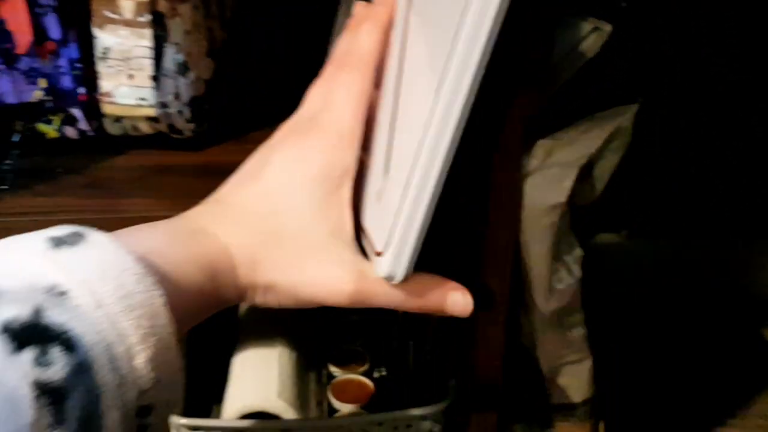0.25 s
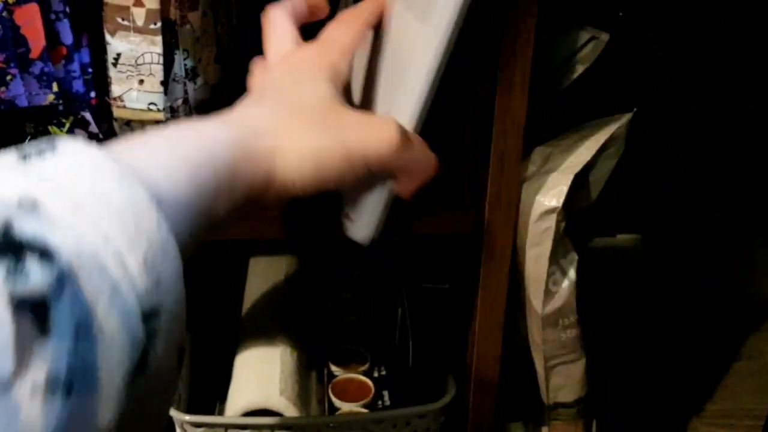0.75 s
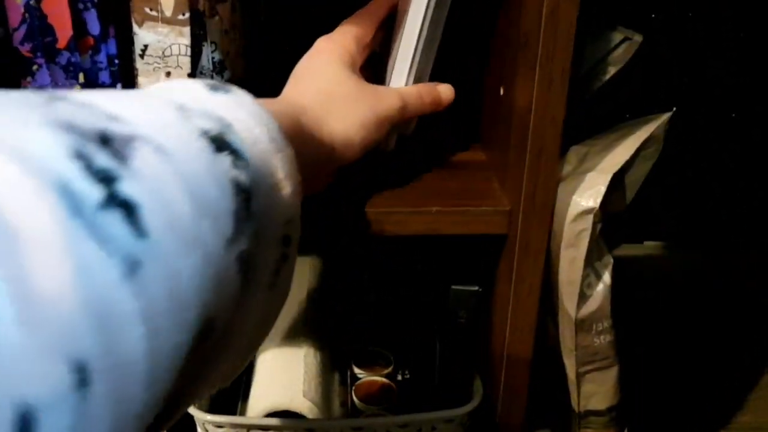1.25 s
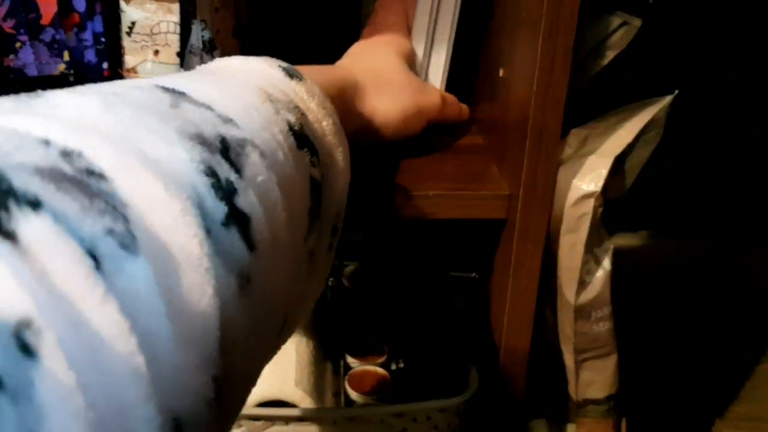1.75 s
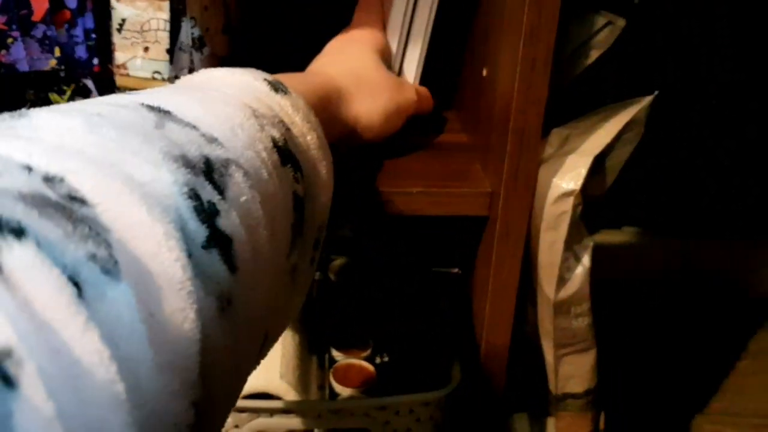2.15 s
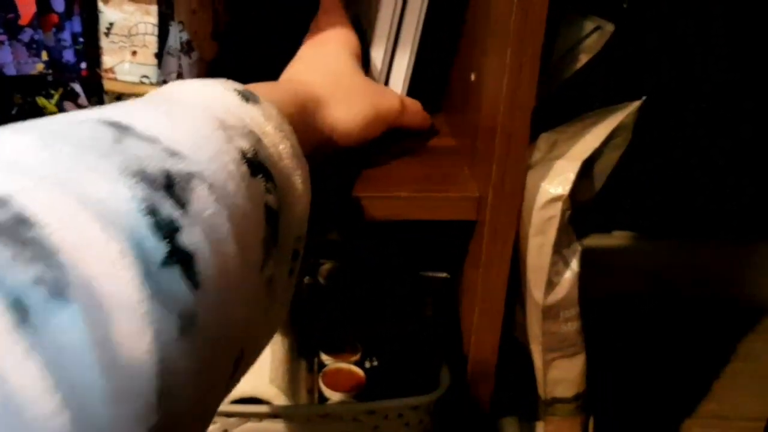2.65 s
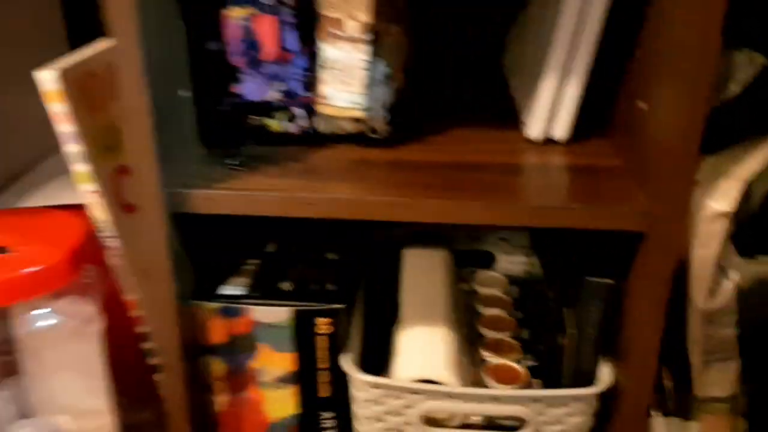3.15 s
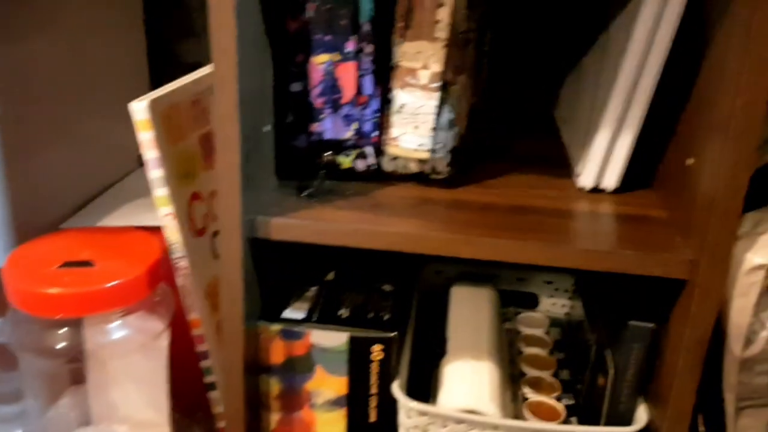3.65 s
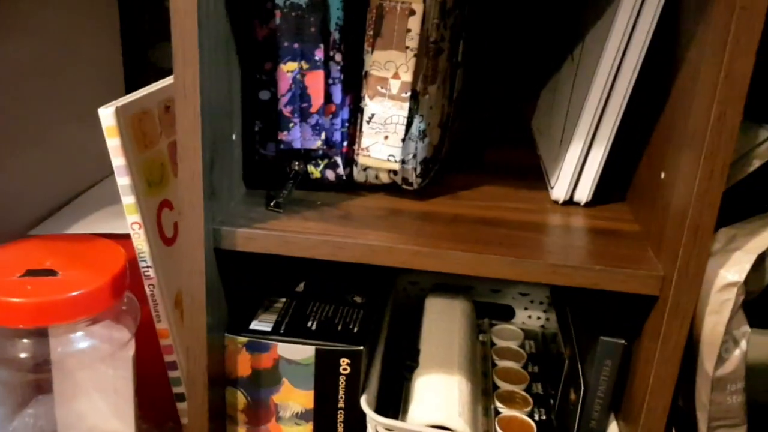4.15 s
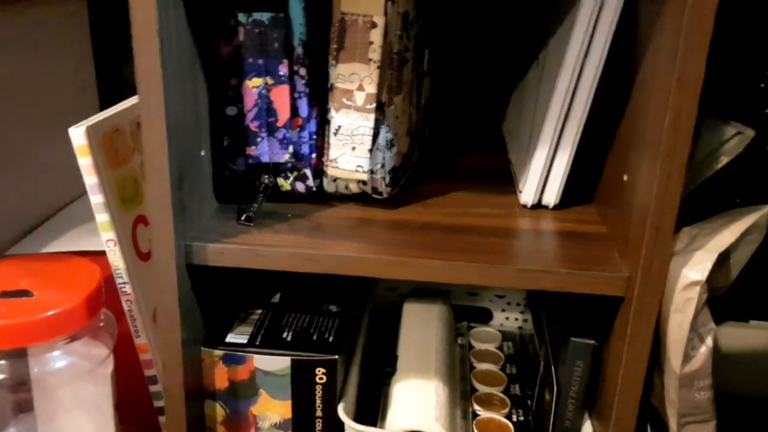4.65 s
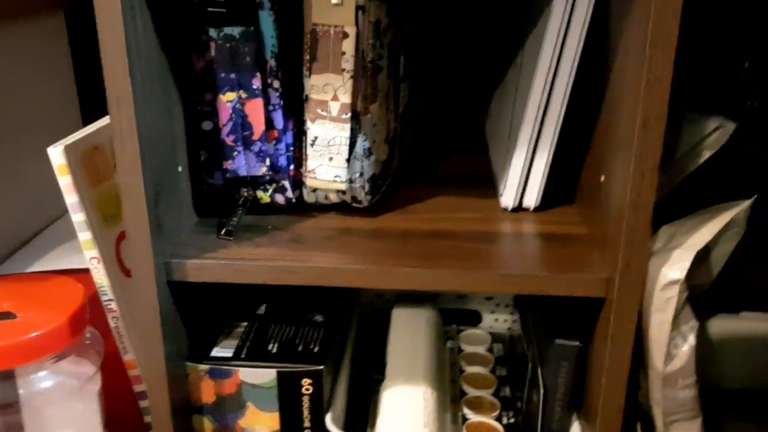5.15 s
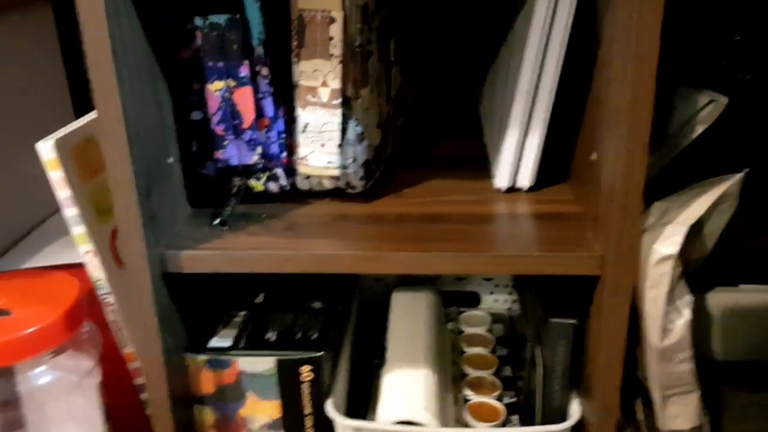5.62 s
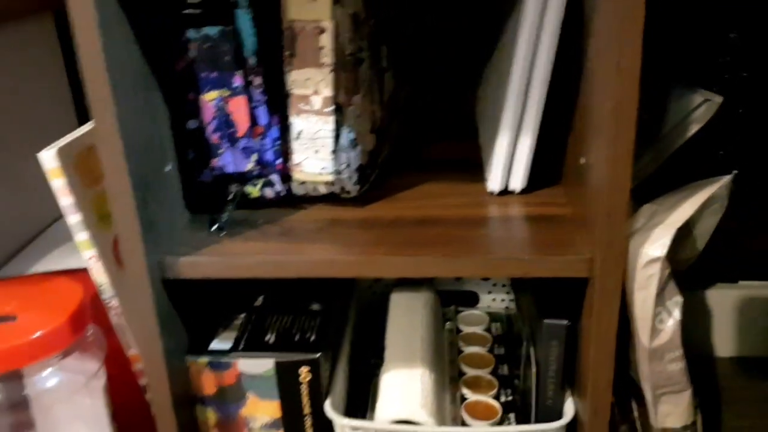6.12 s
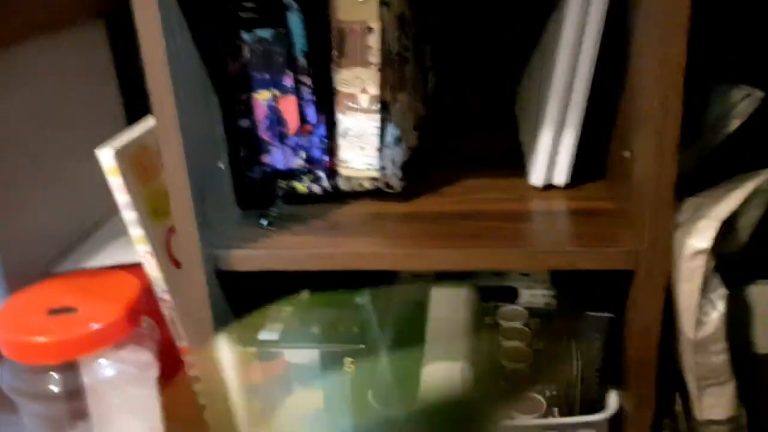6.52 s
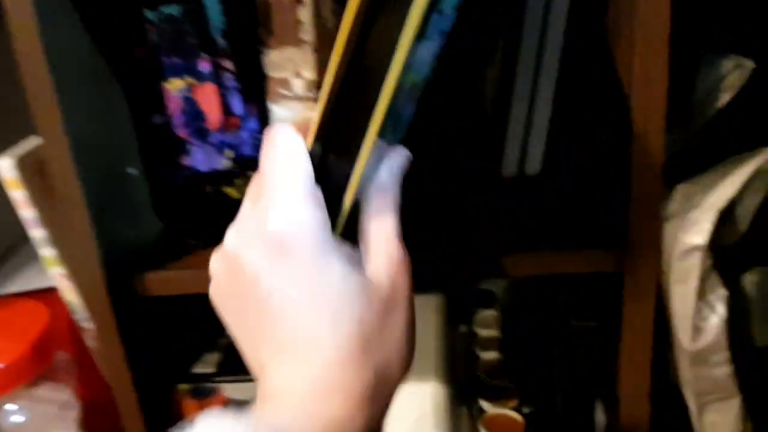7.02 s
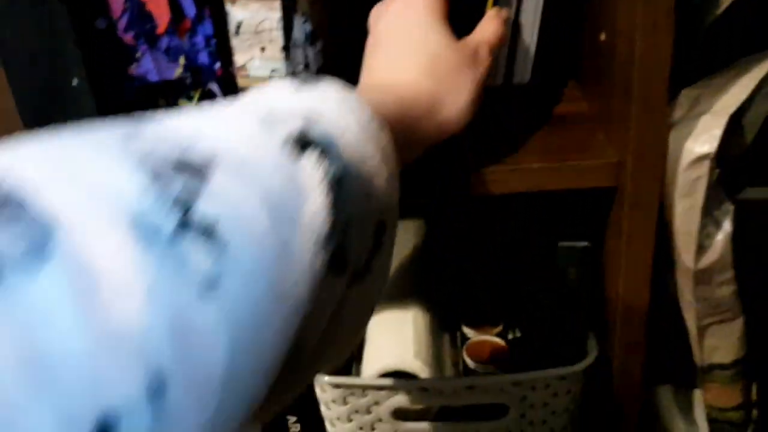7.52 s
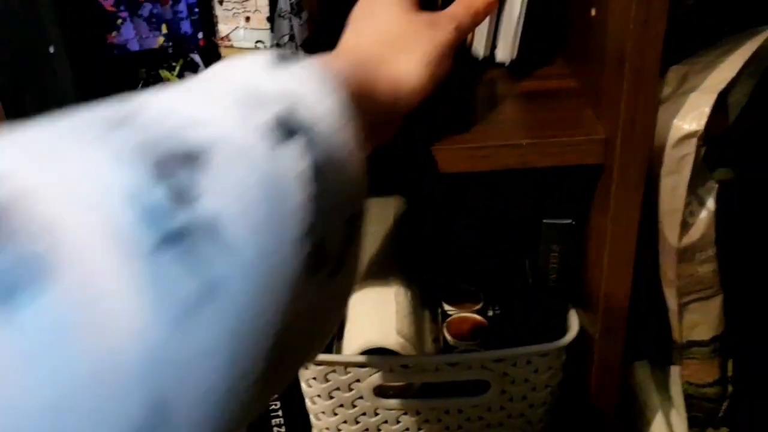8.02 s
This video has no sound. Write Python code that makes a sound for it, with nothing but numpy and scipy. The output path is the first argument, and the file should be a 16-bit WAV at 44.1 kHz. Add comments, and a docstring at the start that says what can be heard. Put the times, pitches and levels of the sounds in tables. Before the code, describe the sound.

Handling sounds at a wooden shelf, picked up by a hand-held stereo microphone, mostly louder on the left. Soft bumps, scraping and fleece brushing come first, then hard knocks with brief pencil rattle and short panel ring. Cases scuff and hiss against each other, another pair lands and squeaks slightly along the wood, and heavy muffled cloth thuds close it over a faint low hum.

```python
"""Flat pencil tins and cases slide about and are set down in a wooden shelf, close to a hand-held camera in a small room.
Each knock is a hard contact, a dying rattle of pencils and the ring of case, boards and struck panel.
Cases shoved over the wood stick and slip; rubs sound at a case's resonance, narrow or broad; one case hisses on another.
A fleece sleeve brushes past the microphone as flicking fibres, and soft thuds bump the camera body.
Every shove, rub and brush is one hand stroke that gathers speed, coasts and stops; the room adds short reflections."""
import sys
import numpy as np
from scipy import signal
from scipy.fft import rfft, irfft
from scipy.io import wavfile
from scipy.ndimage import uniform_filter1d

SR = 44100
rng = np.random.default_rng(int(sys.argv[2]) if len(sys.argv) > 2 else 0)


def materialize(psi):
    """Save the field psi as 16-bit PCM at rate SR to the path in sys.argv[1].

    A 1-D psi becomes a single channel; in a 2-D psi each row is a channel.
    """
    bounded = np.clip(np.atleast_2d(psi).T, -1, 1)
    quanta = np.round(bounded * 32767).astype(np.int16)
    wavfile.write(sys.argv[1], SR, quanta)


N = 365148  # samples

# colour of the room tone: (f/Hz, level/dB)
ROOM_TONE_COLOUR = [(25, -22), (52, -2), (98, -6.5), (130, -25), (5500, -35.5), (7900, -47.5),
                    (11800, -31.5)]
# shoves of a case over the wood, levels before the layer trims:
# (fastest at t/s, speeding up t/s, slowing down t/s, peak level/dB, bass against that level/dB)
SHOVES = [(0.01, 0.079, 0.23, -50, 5.5), (0.22, 0.1, 0.11, -48, 6), (0.44, 0.092, 0.062, -46.5, 6),
          (0.85, 0.18, 0.31, -43.5, 4.5), (1.3, 0.14, 0.43, -43.5, 3.5), (1.57, 0.057, 0.09, -49.5, 8.5),
          (1.77, 0.1, 0.13, -55, 7), (2.15, 0.085, 0.008, -46.5, -8), (3.74, 0.15, 0.15, -50.5, 3),
          (4.12, 0.027, 0.2, -45, -13), (4.405, 0.035, 0.087, -50, -10), (4.56, 0.065, 0.13, -37.5, -15),
          (4.73, 0.052, 0.026, -38, -10), (5.33, 0.12, 0.036, -42, -8), (5.49, 0.03, 0.087, -42, -8),
          (5.7, 0.26, 0.28, -49, -11), (6.11, 0.11, 0.17, -54, -16), (6.485, 0.055, 0.068, -46, -16),
          (6.61, 0.12, 0.15, -51, -8.5), (7.08, 0.012, 0.12, -39.5, 5), (7.26, 0.18, 0.22, -36.5, 2.5),
          (7.52, 0.14, 0.19, -37.5, 3.5)]
# colour of an edge scraping on wood: (f/Hz, level/dB)
SCRAPE_COLOUR = [(100, -5), (220, -2), (550, -13.5), (720, -15.5), (1700, -17.5), (2900, -27.5),
                 (5500, -14.5), (8100, -30), (10600, -28), (15500, -32)]
# rings of case and shelf boards, levels relative to each other: (f/Hz, level/dB, 60 dB decay t/s)
BOARD_RINGS = [(236, -7.5, 0.03), (426, -6.5, 0.064), (541.3, 0, 0.084), (773.4, -0.5, 0.1),
               (896, -0.5, 0.066), (1600, 2, 0.057), (4240, 1.5, 0.091)]
# rubs at a case's resonance, narrow or broad, some loud and under a shove:
# (fastest at t/s, speeding up t/s, slowing down t/s, peak level/dB, f/Hz, half width as a share of f)
RUBS = [(0.25, 0.36, 0.6, -58, 712, 0.094), (0.8, 0.12, 0.3, -43.5, 684, 0.097),
        (1.3, 0.18, 0.76, -53, 1063, 0.43), (3.77, 0.19, 1, -59, 1660, 0.39),
        (4.005, 0.15, 0.011, -60.5, 4200, 0.062), (4.55, 0.14, 0.16, -39.5, 518, 0.18),
        (4.565, 0.069, 0.086, -40.5, 1390, .5), (5.168, 0.045, 0.037, -51, 676, 0.83),
        (6.66, 0.25, 0.086, -57, 1860, .5), (7.235, .08, .03, -34, 640, 0.23),
        (7.228, 0.043, .03, -32.5, 2360, 0.044), (7.33, 0.18, 0.23, -40.5, 2310, .13)]
# soft bumps on the camera body, levels before the trim: (t/s, peak level/dB, f/Hz)
BUMPS = [(0.067, -42, 66.6), (0.216, -32.5, 247), (0.325, -37, 59), (.426, -39, 213), (.769, -30.5, 173),
         (.892, -32.5, 146.5), (1.857, -46.5, 227), (2.927, -38, 286), (2.95, -27, 172),
         (7.571, -22.5, 136), (7.609, -22, 94), (7.688, -25.5, 72.5), (7.791, -29.5, 69.5),
         (7.842, -25.5, 67.8), (7.874, -27, 82), (8.193, -38.5, 181), (8.22, -30.5, 177)]
# sleeve past the microphone, levels before the layer trims:
# (fastest at t/s, speeding up t/s, slowing down t/s, peak level/dB, fizz against that level/dB)
BRUSHES = [(0.195, 0.033, 0.022, -50, 0.5), (0.415, 0.083, 0.11, -56.5, -4),
           (0.703, 0.02, 0.22, -50.5, -2.5), (0.82, 0.1, 0.27, -42.5, 3), (1.31, 0.32, 0.49, -53.5, -1.5),
           (2.83, .16, .17, -60, 10.5), (2.962, .11, .012, -51.5, -1), (7.33, 0.12, 0.15, -37.5, 6.5),
           (7.44, 0.16, 0.39, -43.5, 0), (8.1, 0.11, 0.14, -64.5, 12.5), (8.2, 0.087, 0.076, -57, -11)]
# colour of fleece fibres: (f/Hz, level/dB)
FLEECE_COLOUR = [(300, -4.5), (600, -23.5), (1200, -11), (2500, -5), (3600, -12.5), (6200, -13),
                 (8100, -26.5), (11000, -23.5), (15500, -8)]
# hollows of the camera body that the cloth excites: (f/Hz, width f/Hz, level/dB)
HOLLOWS = [(741, 300, 15.5), (2270, 145, 7.5), (2910, 490, 4.5)]
# knocks: (t/s, loudest level/dB, panel ring f/Hz, bass level/dB, treble level/dB, pencils settling t/s)
KNOCKS = [(0.184, -36.5, 650, 30, 0, 0.029), (0.595, -54, 655, 34, 10, 0.027),
          (2.1517, -19, 793, 11, 5, 0.012), (2.931, -40.5, 345, 30, 3, 0.013),
          (4.018, -18.5, 1220, 7, 1, 0.012), (4.0555, -30.5, 426, 18, -1, 0.043),
          (4.083, -25.5, 1340, 19.5, 18, 0.024), (4.384, -34, 500, 16.5, -24, 0.0031),
          (4.468, -38.5, 533, 24.5, 2, 0.016), (4.676, -31.5, 350, 12.5, 8, 0.028),
          (4.723, -38, 417, 16, 17, 0.02), (5.263, -32, 558, 11, 13, 0.015),
          (5.274, -27, 555, 9.5, -2, 0.0083), (5.343, -31, 558, 11, 4.5, 0.016),
          (5.477, -37.5, 510, 24.5, 5, 0.015), (5.712, -28.5, 301, 15.5, -24, 0.021),
          (5.727, -20, 486, 9, 4, 0.014), (6.2517, -13, 452, 2.5, 5.5, 0.0045),
          (6.255, -19.5, 248, 7, 5.5, 0.019), (7.039, -16.5, 673, 7.5, 2.5, 0.0083),
          (7.105, -35.5, 647, 17, 13, 0.013), (7.227, -22.5, 550, 13.5, 8.5, 0.019),
          (7.263, -21.5, 223, 30, 17, 0.0065)]
# colour of contact and rattle: (f/Hz, level/dB)
KNOCK_COLOUR = [(125, -23), (240, -9), (600, -1.5), (1500, 0.5), (2200, -4), (3200, -11), (5800, -17.5),
                (7000, -23), (8200, -37), (10500, -27.5), (15500, -35.5)]
# one smooth case drawn along another: (fastest at t/s, speeding up t/s, slowing down t/s)
GLIDE_STROKE = (5.782, 0.29, 0.39)
# colour of the hiss between smooth faces: (f/Hz, level/dB)
GLIDE_COLOUR = [(500, -11), (2000, -8), (5500, -3), (8100, -19), (10000, -10.5)]
# decay of the room: (f/Hz, 60 dB decay t/s)
ROOM_DECAY = [(200, 0.26), (15000, 0.19)]
# likeness of the two microphone ports: (f/Hz, left-right correlation)
PORT_LIKENESS = [(220, 1), (500, 0.71), (1000, 0.37), (2500, 0.074), (6000, 0.2)]
# balance of the two microphone ports: (f/Hz, left minus right level/dB)
PORT_BALANCE = [(60, 8.5), (250, 4.5), (600, 5), (2000, 4), (5500, 0), (9000, 3.5)]

# level of a stroke against its peak, one speeding-up time before it and one slowing-down time after it
SET_OFF_DB, RUN_OUT_DB = -18.5, -16
PICK_UP, COAST = 2.03, 1.39  # powers of time by which a stroke nears its peak and leaves it
STOP_DB_PER_S = 331.5  # how fast the rubbing dies once the hand has stopped


def amp(db):
    """Decibels to gain."""
    return 10 ** (np.asarray(db) / 20)


def unit(x):
    """Scales to an rms of one."""
    return x / np.sqrt(np.mean(x ** 2) + 1e-20)


def read(points, hz):
    """Reads a table along a logarithmic frequency axis."""
    f, value = np.transpose(points)
    return np.interp(np.log(hz + 1), np.log(f + 1), value)


def bins(x):
    """Frequencies of the spectrum of x, in Hz."""
    return np.fft.rfftfreq(x.shape[-1], 1 / SR)


def add(mix, start_s, sound):
    """Mixes a two-channel sound in from start_s."""
    part = mix[:, max(round(start_s * SR), 0):][:, :sound.shape[1]]
    part += sound[:, :part.shape[1]]


def coloured(x, db):
    """Minimum-phase filter with a gain in dB for each bin: nothing sounds before its cause."""
    log_gain = np.log(amp(np.r_[db, db[-2:0:-1]]))
    response = np.exp(np.conj(signal.hilbert(log_gain)))[:len(db)]
    return irfft(rfft(x) * response)


def band(x, lo_hz, hi_hz):
    """Band-pass with fairly steep skirts."""
    return signal.sosfilt(signal.butter(3, [lo_hz, hi_hz], "band", fs=SR, output="sos"), x)


def wander(rate_hz):
    """Smooth chance with an rms of one; faster movement than rate_hz fades out."""
    noise = rng.standard_normal(N)
    return unit(irfft(rfft(noise) * np.exp(-(bins(noise) / rate_hz) ** 2)))


def ports(x):
    """Two unrelated signals become a microphone pair: alike in the bass, the left mostly louder."""
    hz, (a, b) = bins(x), rfft(x)
    same = np.clip(read(PORT_LIKENESS, hz), -1, 1)
    lean_db = read(PORT_BALANCE, hz) / 2
    left = a * amp(lean_db)
    right = (same * a + np.sqrt(1 - same ** 2) * b) * amp(-lean_db)
    return irfft([left, right])


def stroke(peak_s, rise, fall):
    """Gain of one hand movement: it gathers speed until peak_s, coasts, then stops."""
    t = np.arange(N) / SR - peak_s
    early = np.clip(-t / rise, 0, 5)
    late = np.clip(t / fall, 0, 1)
    stopped_s = np.clip(t - fall, 0, 1)
    return amp(SET_OFF_DB * early ** PICK_UP + RUN_OUT_DB * late ** COAST - STOP_DB_PER_S * stopped_s)


def strokes(rows):
    """Overlapping movements add in power; returns their gain and the tone of those under way, in dB."""
    power, tone = np.zeros(N), np.zeros(N)
    for peak_s, rise, fall, peak_db, tone_db in rows:
        one = (amp(peak_db) * stroke(peak_s, rise, fall)) ** 2
        power += one
        tone += one * amp(tone_db) ** 2
    return np.sqrt(power), 10 * np.log10((tone + 1e-20) / (power + 1e-20))


def slips(per_s, spread_db):
    """Random tiny slips of uneven size, as sparse impulses of either sign."""
    happens = rng.random(N) < per_s / SR
    size = amp(spread_db * np.minimum(rng.exponential(1, N), 4)) * happens
    return unit(size * rng.standard_normal((2, N)))


def boards(x, ring_db):
    """Adds the decaying resonances of case and shelf to whatever shakes them."""
    t = np.arange(SR // 3) / SR
    ring = sum(amp(db - 60 * t / t60) * np.cos(2 * np.pi * hz * t) for hz, db, t60 in BOARD_RINGS)
    ring /= np.linalg.norm(ring)
    return x + amp(ring_db) * signal.fftconvolve(x, ring[None], axes=1)[:, :x.shape[1]]


def cubby(x, echo=0.66, longest_s=.009, count=7):
    """Close walls return the sound within milliseconds; the comb in its spectrum drifts slowly at random."""
    n, out = np.arange(N), x.copy()
    delay = longest_s * SR * (1 + .03 * wander(rate_hz=3))  # samples
    for side in range(2):
        for share, sign in zip(rng.uniform(.1, 1, count), rng.choice([-1, 1], count)):
            reflection = np.interp(n - share * delay, n, x[side])
            out[side] += sign * echo / np.sqrt(count) * reflection
    return out


def room_tone(level_db=-62.5):
    """Low hum of the house and faint microphone hiss, both as coloured noise."""
    noise = rng.standard_normal((2, N))
    return amp(level_db) * unit(ports(coloured(noise, read(ROOM_TONE_COLOUR, bins(noise)))))


def scrapes(level_db=2, bass_db=-2.0, grit_db=-15, judder_db=1.8, scuff_db=1.5):
    """A sliding edge sticks and slips: the boards growl in uneven scuffs under a hiss of grit."""
    push, weight_db = strokes(SHOVES)
    drive = slips(per_s=4500, spread_db=2) * amp(judder_db * wander(rate_hz=55))
    shaken = boards(drive, ring_db=-18.5)
    rub = cubby(ports(coloured(shaken, read(SCRAPE_COLOUR, bins(drive)))))
    scuffs = amp(scuff_db * wander(rate_hz=20))
    growl = unit(band(rub, 160, 340) * scuffs) * amp(bass_db + weight_db)
    wood = unit(band(rub, 289, 3600)) * amp(level_db)
    grit = unit(band(rub, 2600, 16000)) * amp(grit_db)
    return push * (growl + wood + grit)


def rubs(rough_db=3.0):
    """Small, uneven catches sound at a case's resonance, narrow or broad, some loud and under a shove."""
    catches = slips(per_s=1500, spread_db=2) * amp(rough_db * wander(rate_hz=30))
    out = np.zeros((2, N))
    for peak_s, rise, fall, peak_db, hz, width in RUBS:
        resonance = unit(band(catches, hz / (1 + width), hz * (1 + width)))
        out += amp(peak_db) * stroke(peak_s, rise, fall) * resonance
    return ports(out)


def bumps(level_db=-5, swell_s=0.0085, roughness=0.68, port_db=19, port_hz=146):
    """Padded blows: a swelling thud. The deepest are cloth landing right on the left microphone port."""
    out, t = np.zeros((2, N)), np.arange(SR // 5) / SR
    envelope = t / swell_s * np.exp(1 - t / swell_s)
    for start_s, peak_db, hz in BUMPS:
        tone = np.sqrt(2) * np.sin(2 * np.pi * hz * t)
        rough = unit(band(rng.standard_normal(len(t)), hz / 2, hz * 2))
        thud = (tone + roughness * rough) * envelope
        sides = amp([[0], [-port_db if hz < port_hz else -5]])
        add(out, start_s, amp(peak_db + level_db) * sides / sides.mean() * thud)
    return out


def sleeve(level_db=4.5, fizz_trim_db=3, flutter_db=1.5):
    """Countless fibres flick over the camera and sound its hollows; each brush has its own share of fizz."""
    speed, fizz_db = strokes(BRUSHES)
    fibres = slips(per_s=14000, spread_db=1) * amp(flutter_db * wander(rate_hz=18.5))
    hz = bins(fibres)
    hollows_db = sum(db / (1 + (2 * (hz - f) / width) ** 2) for f, width, db in HOLLOWS)
    cloth = cubby(ports(coloured(fibres, read(FLEECE_COLOUR, hz) + hollows_db)))
    brush = unit(band(cloth, 520, 4000)) * amp(level_db)
    fizz = unit(band(cloth, 3620, 11960)) * amp(fizz_db + fizz_trim_db)
    return speed * (brush + fizz)


def knock(peak_db, panel_hz, bass_db, treble_db, settle_s,
          contact=0.31, panel_db=-5, panel_cycles=19, bass_hz=380, treble_hz=2600):
    """One hard contact, a fast dying rattle of pencils, and the short ring of the struck panel."""
    t = np.arange(16384) / SR
    envelope = np.exp(-t / settle_s) - np.exp(-t / 0.0011)
    uneven = amp(3.7 * rng.standard_normal(len(t)))
    rattle = rng.standard_normal((2, len(t))) * uneven * envelope
    rattle /= np.linalg.norm(rattle, axis=1, keepdims=True)
    rattle[0, 0] += contact  # in the signal that both ports share
    hz = bins(rattle)
    shelves_db = bass_db / (1 + (hz / bass_hz) ** 4) + treble_db * hz ** 4 / (hz ** 4 + treble_hz ** 4)
    clack = ports(coloured(boards(rattle, ring_db=-20.0), read(KNOCK_COLOUR, hz) + shelves_db))
    ring = np.sin(2 * np.pi * panel_hz * t) * amp(-60 * t * panel_hz / panel_cycles)  # 60 dB in panel_cycles
    panel = unit(band(ring, panel_hz / 2, panel_hz * 2)) * amp([[2], [-2]])  # leans left
    fade = np.cos(np.pi / 2 * t / t[-1]) ** 2
    sound = (unit(clack) + amp(panel_db) * panel) * fade
    loudest = uniform_filter1d(sound.mean(0) ** 2, size=350).max()  # power over about 8 ms
    return amp(peak_db) * sound / np.sqrt(loudest)


def knocks():
    """Cases meet the shelf and each other."""
    out = np.zeros((2, N))
    for start_s, *blow in KNOCKS:
        add(out, start_s, knock(*blow))
    return out


def glide(level_db=-46, hiss_db=-1, width_hz=1100, top_hz=2130, sink_hz_per_s=1400, rough_db=2.0):
    """Smooth faces hiss along each other, catching unevenly, through a broad resonance that sinks as they part."""
    peak_s, rise, fall = GLIDE_STROKE
    speed = stroke(peak_s, rise, fall)
    hz = top_hz - sink_hz_per_s * np.clip(np.arange(N) / SR - peak_s, 0, fall)
    noise = rng.standard_normal((2, N)) * amp(rough_db * wander(rate_hz=29))
    # shift the moving resonance down to 0 Hz, filter there, and shift back
    turn = np.exp(2j * np.pi * np.cumsum(hz) / SR)
    r = np.exp(-np.pi * width_hz / SR)
    rub = signal.lfilter([1], [1, -2 * r, r * r], noise / turn) * turn
    hiss = coloured(noise[::-1], read(GLIDE_COLOUR, bins(noise)))  # channels swapped
    return amp(level_db) * speed * ports(unit(rub.real) + amp(hiss_db) * unit(hiss))


def room(x, build_up_s=0.015):
    """Dense reflections of a small furnished room, the treble dying first."""
    hz, t, z = signal.stft(rng.standard_normal((2, SR // 2)), SR, nperseg=256)
    decay = amp(-60 * t / read(ROOM_DECAY, hz)[:, None])
    tail = signal.istft(z * decay, SR, nperseg=256)[1]
    tail *= 1 - np.exp(-(np.arange(tail.shape[1]) / SR / build_up_s) ** 2)
    tail = ports(tail / np.linalg.norm(tail[0]))
    return signal.fftconvolve(x.mean(0)[None], tail, axes=1)[:, :N]


def scene():
    """The shelf sounds into the room; sleeve and bumps are close and slightly drier."""
    shelf = scrapes() + rubs() + knocks() + glide()
    close = bumps() + sleeve()
    return room_tone() + shelf + close + room(amp(-10.5) * shelf + amp(-13.0) * close)


def record(dry, low_cut_hz=42, edge_hz=15650):
    """The recorder's low cut and band limit."""
    dry = signal.sosfilt(signal.butter(3, low_cut_hz, "high", fs=SR, output="sos"), dry)
    band_limit = signal.firwin(511, edge_hz, window=("kaiser", 9), fs=SR)
    return signal.oaconvolve(dry, band_limit[None], "same", axes=1)


dry = scene()
out = record(dry)
materialize(out)
```